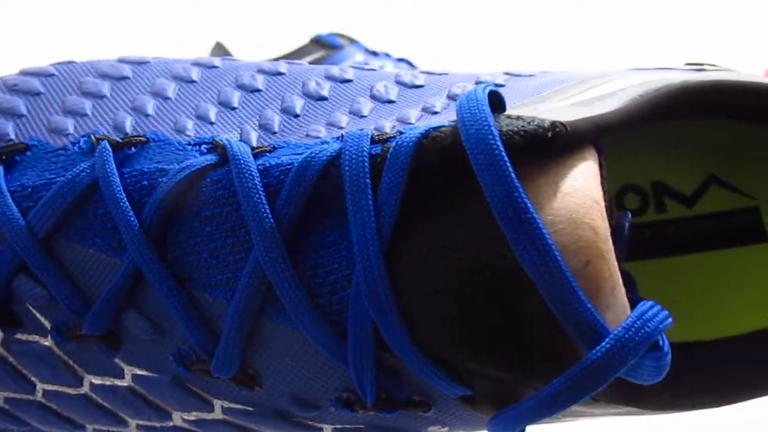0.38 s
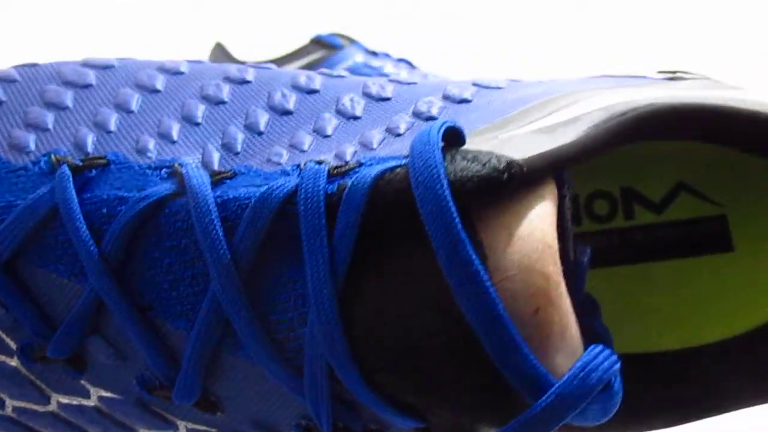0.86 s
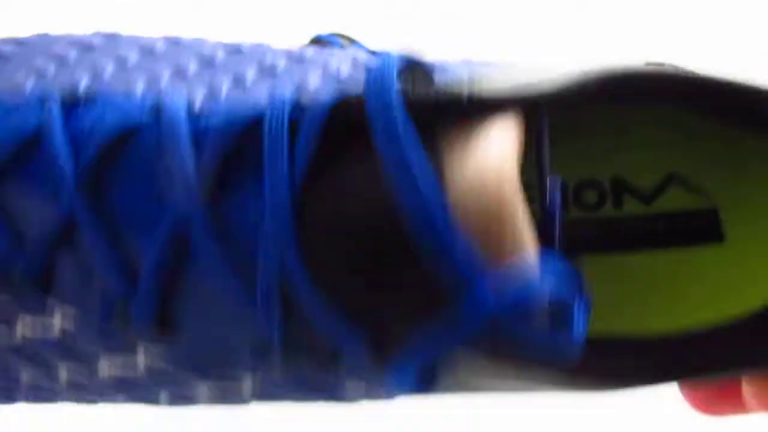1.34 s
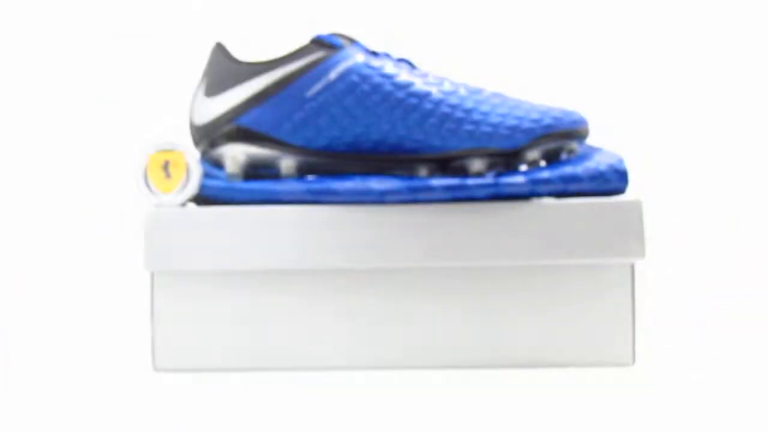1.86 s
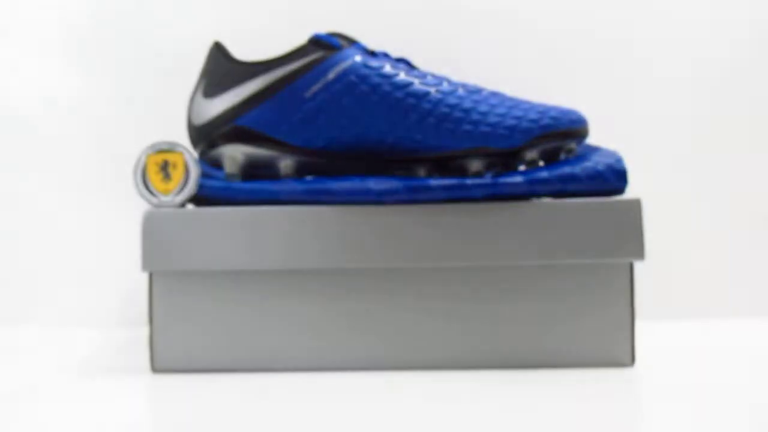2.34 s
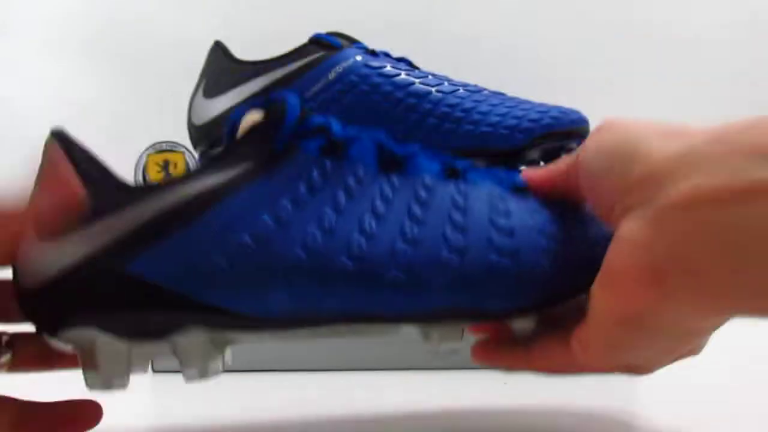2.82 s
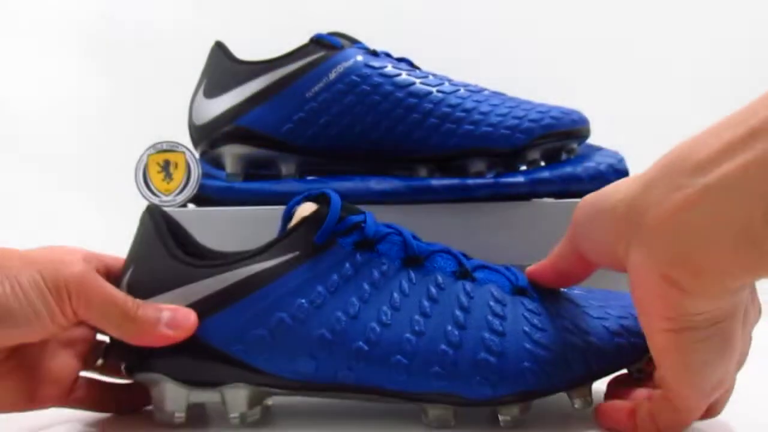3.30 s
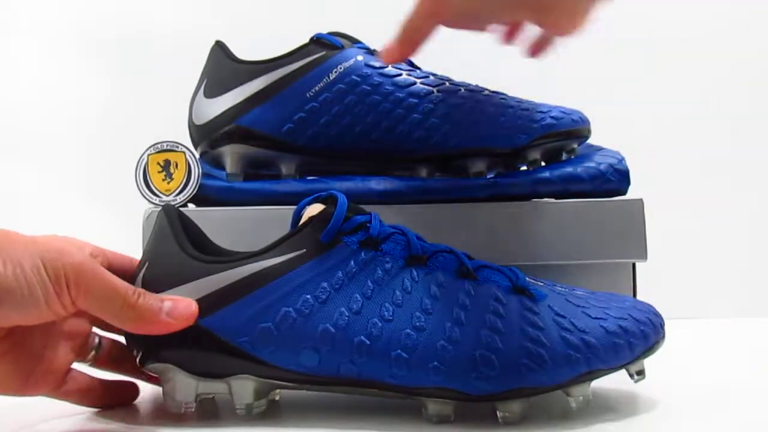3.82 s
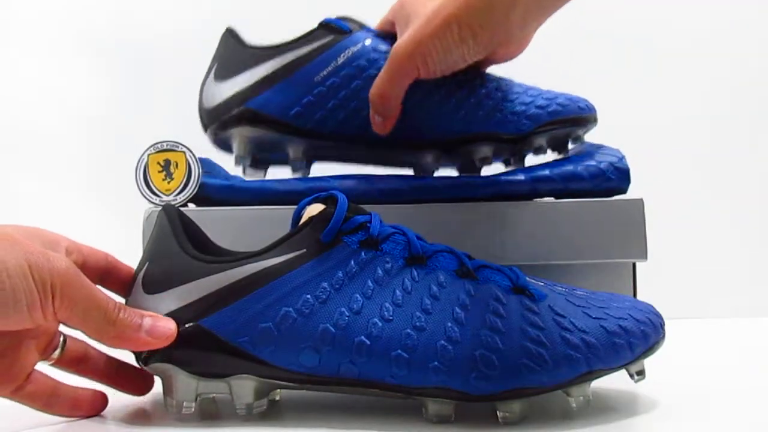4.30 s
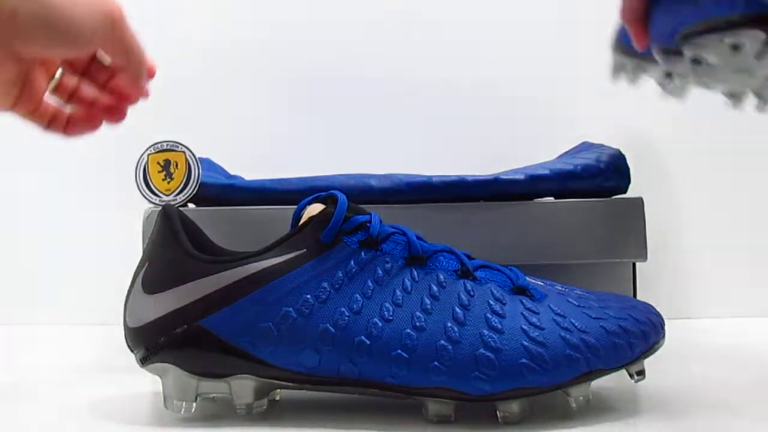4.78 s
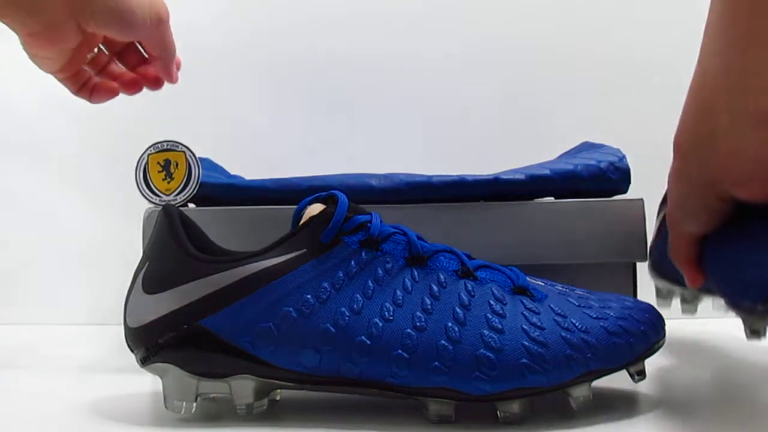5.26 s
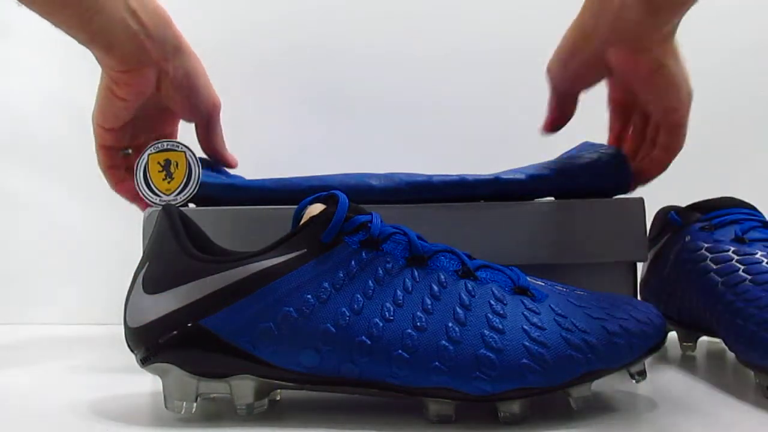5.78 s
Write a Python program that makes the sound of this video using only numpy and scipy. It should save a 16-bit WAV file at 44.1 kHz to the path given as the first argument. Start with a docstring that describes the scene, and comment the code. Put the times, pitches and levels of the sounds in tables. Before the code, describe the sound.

In a quiet small room, close to a stereo microphone, hands turn a football boot with faint rubbing and tiny ticks. A very sharp, dry plastic clack bursts out at two seconds, followed by bumps and scuffs. Studs thud onto a table around three seconds, then light handling. A second boot lands in a rapid cluster of hard knocks with a bright scrape, ending in soft rustling.

```python
"""A quiet room: a football boot is turned in the hands close to a stereo microphone, then two boots are set on a table.
Fingers rub the textured upper in swelling strokes of noise, and narrow noise booms in the hollow boot.
Bumps, the sole's clack and the stud knocks are dying sines; short snaps and rasps tick; loose parts rattle as noise.
The hits also ring through a small room of near echoes and a sparse tail, over room air and a faint hum."""
import sys
import numpy as np
from scipy import signal
from scipy.io import wavfile
from scipy.ndimage import uniform_filter1d

SR = 44100
rng = np.random.default_rng(int(sys.argv[2]) if len(sys.argv) > 2 else 0)


def gain_from_decibels(decibels):
    """Convert decibel values to linear amplitude factors."""
    exponent = np.asarray(decibels, float) / 20
    return 10 ** exponent


def output_pcm(signal):
    """Save a mono or channel-first signal as 16-bit PCM at the path in sys.argv[1].

    Samples are clipped to [-1, 1] before scaling.
    """
    pcm = np.clip(np.atleast_2d(signal).T, -1, 1) * 32767
    wavfile.write(sys.argv[1], SR, np.round(pcm).astype(np.int16))


N = 270460  # length in samples


def evened(x):
    """Scales to rms 1."""
    return x / np.sqrt(np.mean(x ** 2) + 1e-20)


def read(points, hz):
    """Reads a table of (Hz, value) over log frequency."""
    f, value = np.transpose(points)
    return np.interp(np.log(hz + 1), np.log(f + 1), value)


def add(mix, s, sound, pan_db):
    """Places a sound in level and time: the capsules are spaced, so the louder side also hears it first."""
    lag_ms_per_db = 0.13
    waves = np.broadcast_to(sound, (2, sound.shape[-1]))
    for side, sign, wave in zip(mix, (1, -1), waves):
        start = round((s - sign * pan_db * lag_ms_per_db / 2000) * SR)  # each side takes half the lag
        part = side[start:][:len(wave)]
        part += gain_from_decibels(sign * pan_db / 2) * wave[:len(part)]


def band(x, hz, sharp):
    """A broad resonance passed twice, for steep flanks."""
    b, a = signal.iirpeak(hz, sharp, SR)
    return signal.lfilter(b, a, signal.lfilter(b, a, x))


def ring(modes, spread_db, detune):
    """Struck modes as dying sines, a little different for each blow, peak 1."""
    t = np.arange(SR // 2) / SR
    luck = rng.standard_normal((len(modes), 2))
    x = 0
    for (hz, db, t60), (louder, sharper) in zip(modes, luck):
        decay = gain_from_decibels(db + spread_db * louder - 60 * t / t60)
        x = x + decay * np.sin(2 * np.pi * hz * (1 + detune * sharper) * t)
    return x / abs(x).max()


def rattle(bands, apart):
    """Loose parts as dying noise in broad bands, partly different at the two capsules."""
    t = np.arange(SR // 6) / SR
    grit = rng.standard_normal(len(t)) + apart * rng.standard_normal((2, len(t)))
    return sum(gain_from_decibels(db - 60 * t / t60) * evened(band(grit, hz, 1.13)) for hz, db, t60 in bands)


def noise(colour, same, patchy_db, size):
    """Stereo noise of random short spectra with drifting patches, rms 1."""
    hop = size // 4
    frames, hz = N // hop + 5, np.fft.rfftfreq(size, 1 / SR)
    a, b, c, d, patches = rng.standard_normal((frames, len(hz), 5)).T
    patches = uniform_filter1d(patches, size // 64, 0)  # smooth over frequency
    patches = evened(uniform_filter1d(patches, 8, 1))  # and over time
    like = np.clip(read(same, hz), -1, 1)[:, None]
    left = a + 1j * b
    right = like * left + np.sqrt(1 - like ** 2) * (c + 1j * d)
    spectra = np.array([left, right]) * gain_from_decibels(read(colour, hz)[:, None] + patchy_db * patches)
    return evened(signal.istft(spectra, nperseg=size, noverlap=size - hop)[1][:, :N])


# Colour of the room air. Each row: frequency in Hz, relative density in dB per Hz.
AIR_COLOUR = [(12, -37), (20, 7), (60, -2), (98, -6), (210, -8.5), (367, -19), (459, -12.5), (542, -18),
              (780, -19), (976, -20), (1090, -17), (1960, -25.5), (2140, -29), (9670, -31.5),
              (16000, -36.5)]
# Likeness of the air at the two capsules. Each row: frequency in Hz, left-right likeness (0 to 1).
AIR_LIKENESS = [(40, 0.067), (100, 0.022), (300, 0.064), (700, 0.12), (3000, 0.034), (15000, 0.047)]
# Mains hum. Each row: frequency in Hz, level in dB rms.
MAINS_HUM = [(50, -59), (100, -76), (150, -75), (200, -69)]


def air():
    """Still room air as coloured noise, with a faint hum of steady sines."""
    t = np.arange(N) / SR
    hum = 0
    for hz, db in MAINS_HUM:
        hum = hum + np.sqrt(2) * gain_from_decibels(db) * np.sin(2 * np.pi * (hz * t + rng.random()))
    return hum + gain_from_decibels(-51.5) * noise(AIR_COLOUR, AIR_LIKENESS, 0.87, size=2048)


# Decay of the room tail. Each row: frequency in Hz, t60 in seconds.
ROOM_DECAY = [(100, 0.1), (500, 0.32), (2000, 0.24), (5000, 0.22), (12000, 0.36)]
# Echoes of near walls. Each row: delay in ms (a hair later at random), level in dB.
NEAR_ECHOES = [(1.3, -22.5), (2.6, -16.5), (4.5, -28.5), (9.5, -19.5), (13, -25.5), (23.5, -17.5)]


def room(x):
    """A few near echoes, and sparse taps of random sign that die band by band."""
    taps = np.zeros((2, SR // 2))
    at = np.arange(200, SR // 2 - 20, 20)
    at = at + rng.integers(0, 20, (2, len(at)))
    np.put_along_axis(taps, at, rng.choice([-1., 1.], at.shape), 1)
    hz, t, spectra = signal.stft(taps, SR, nperseg=256)
    decay = gain_from_decibels(-60 * t / read(ROOM_DECAY, hz)[:, None])
    tail = signal.istft(spectra * decay, SR, nperseg=256)[1]
    tail *= gain_from_decibels(-11.5) / np.linalg.norm(tail[0])
    for ms, db in NEAR_ECHOES:
        tail[[0, 1], round(ms * SR / 1000) + rng.integers(0, 6, 2)] += gain_from_decibels(db)
    return signal.fftconvolve(x, tail, axes=1)[:, :N]


# Skin, cloth or sole sliding over a surface. Each row: loudest moment in seconds, rise in seconds,
# fall in seconds, glide hiss in dB, scuff in dB (both at the loudest moment).
SLIDING_STROKES = [(.732, 0.033, .02, -64, -61.5), (.81, 0.037, 0.095, -53.5, -53.5),
                   (1.036, 0.042, 0.08, -65, -59), (1.33, 0.093, 0.083, -58.5, -58),
                   (1.48, .05, 0.09, -67, -61), (1.634, .03, 0.05, -52, -52),
                   (1.792, .12, 0.016, -45, -50.5), (1.845, 0.022, 0.036, -53.5, -67),
                   (1.889, .012, 0.051, -47.5, -48.5), (1.96, 0.036, 0.028, -47.5, -58.5),
                   (2.012, 0.023, 0.036, -37.5, -57), (2.11, 0.036, 0.024, -66, -75),
                   (2.15, .012, 0.025, -55, -46), (2.39, 0.19, 0.025, -53, -59),
                   (2.45, 0.025, 0.02, -49, -52), (2.566, 0.048, 0.033, -47.5, -49),
                   (2.63, .04, 0.057, -52, -56.5), (2.758, 0.048, 0.037, -45, -48),
                   (2.93, 0.11, 0.12, -57.5, -53), (3.07, 0.048, .2, -49, -49),
                   (3.235, 0.18, 0.035, -76, -49), (3.32, 0.042, .2, -62, -75),
                   (3.552, 0.017, 0.018, -47, -47), (3.84, 0.22, 0.22, -55.5, -84),
                   (4.025, .025, 0.25, -59.5, -55), (4.2, 0.021, 0.093, -52.5, -52),
                   (4.366, 0.059, 0.013, -64, -58), (4.446, 0.068, .1, -66, -58.5),
                   (4.71, 0.014, 0.12, -62, -62), (5.052, 0.0083, 0.019, -59.5, -56),
                   (5.15, 0.014, .04, -65, -57), (5.289, 0.0073, 0.094, -23, -49),
                   (5.338, 0.042, .08, -19.5, -41.5), (5.482, .03, 0.05, -27, -44),
                   (5.825, 0.036, 0.036, -53.5, -54.5), (5.911, 0.054, 0.048, -44.5, -49.5),
                   (5.965, 0.043, 0.052, -44.5, -45.5), (6.049, 0.026, 0.16, -46.5, -42.5),
                   (6.11, 0.048, 0.086, -62, -42.5)]


def strokes(t):
    """Power of glide and scuff: each stroke swells to its loudest moment and fades."""
    edge_db, roundness = -12.5, 1.74  # level at the ends of rise and fall; how flat the top is
    power = np.zeros((2, len(t)))
    for s, rise, fall, glide_db, scuff_db in SLIDING_STROKES:
        away = np.where(t < s, (s - t) / rise, (t - s) / fall)
        loudest_db = np.array([[glide_db], [scuff_db]])
        power += gain_from_decibels(2 * (loudest_db + edge_db * away ** roundness))
    return power


# The grip shifting all the while. Each row: time in seconds, scuff in dB, boot hollow in dB,
# handling rumble in dB, hands' place as left minus right in dB.
GRIP_SHIFTS = [(0, -73, -84, -66, 4), (.66, -70, -73, -67, -6), (.76, -68, -53, -60.5, -5.5),
               (1.0, -75, -62, -71, -4), (1.27, -63, -54.5, -86, -10.5), (1.56, -59, -61, -62, -2.5),
               (1.72, -62, -57.5, -56, 1), (1.83, -58.5, -58, -63, 2.5), (1.94, -55, -50.5, -48, 1),
               (2.12, -49.5, -54, -49, 0.5), (2.3, -49.5, -65, -56, 1.5), (2.58, -50, -45, -56, 1),
               (2.78, -63.5, -60.5, -71, 0), (3.0, -73, -56, -56, 1), (3.2, -61, -55, -40, 0.5),
               (3.5, -56.5, -59.5, -61, -0.5), (3.801, -63, -75, -70, 3), (4.0, -65, -78, -64, 3),
               (4.17, -57.5, -64.5, -53, -1.5), (4.35, -65.5, -71, -57.5, 1),
               (4.621, -55.5, -67.5, -68.5, -1), (5.1, -65.5, -59, -72, -2.5), (5.3, -65, -73, -55.5, 2.5),
               (5.52, -43, -47, -39, 0.5), (5.68, -72, -90, -73, 1), (5.821, -60, -70, -49, 0),
               (6.02, -51.5, -58, -55.5, 0.5), (6.13, -56, -51.5, -45, -0.5)]
# Colours of glide, scuff and rumble. Each row: frequency in Hz, relative density in dB per Hz.
GLIDE_COLOUR = [(1180, -27), (2000, -18.5), (2360, -32), (3580, -10), (4610, -12.5), (5030, -11.5),
                (6090, -6.5), (7700, -6), (9010, 0.5), (11400, 0), (15300, -11.5), (16000, -49)]
SCUFF_COLOUR = [(300, 4), (700, 3), (1500, 0.5), (3000, -3), (6000, -6), (12000, -16)]
RUMBLE_COLOUR = [(30, -34), (70, 6.5), (130, -2), (220, 2), (320, -2.5), (600, -37.5)]
# Likeness of the rubbing at the two capsules. Each row: frequency in Hz, left-right likeness (-1 to 1).
RUB_LIKENESS = [(60, 0.16), (240, 0.84), (950, 0.72), (3770, -0.1), (15000, -0.11)]
# Air resonance in the boot. One row: frequency in Hz, width in Hz.
BOOT_HOLLOW = (361.5, 30)


def rubbing():
    """Skin and cloth glide and scuff on the textured upper and shake the boot's hollow."""
    now, coarse = np.arange(N) / SR, np.arange(0, N + 32, 32) / SR
    s, *columns = np.transpose(GRIP_SHIFTS)
    grip_db, hollow_db, rumble_db, pan_db = (np.interp(now, s, c) for c in columns)
    glide, scuff = (np.interp(now, coarse, power) for power in strokes(coarse))
    # the texture catches unevenly
    catch = gain_from_decibels(1.64 * evened(uniform_filter1d(rng.standard_normal(N), 150)))
    # slower unevenness of hollow and rumble
    heave = gain_from_decibels(4.3 * evened(uniform_filter1d(rng.standard_normal(N), 900)))
    hollow_hz, width_hz = BOOT_HOLLOW
    hz = np.geomspace(100, 1200, 60)
    peak_db = -20 * np.log10(1 + (2 * (hz - hollow_hz) / width_hz) ** 2) / 1.79
    hollow_colour = np.transpose([hz, peak_db])
    high = np.sqrt(glide) * noise(GLIDE_COLOUR, RUB_LIKENESS, 1.3, size=256)
    scuffing = evened(catch * noise(SCUFF_COLOUR, RUB_LIKENESS, 2.5, size=256))
    high += np.sqrt(scuff + gain_from_decibels(2 * grip_db)) * scuffing
    low = gain_from_decibels(hollow_db) * noise(hollow_colour, [(100, 0.66), (1000, 1.0)], 1.7, size=2048)
    low += gain_from_decibels(rumble_db) * noise(RUMBLE_COLOUR, [(50, 0.93), (300, 0.73)], 3.0, size=2048)
    return high * gain_from_decibels(np.array([pan_db / 2, -pan_db / 2])) + low * evened(heave)


# Fingers and knuckles bump boot, lid or table. Each row: start in seconds, level in dB, pitch in Hz
# (varied a little), t60 in seconds, left minus right in dB (halved in playing).
SOFT_BUMPS = [(0.276, -44.5, 344, 0.065, -5), (0.8, -43, 80.7, 0.059, -4), (1.796, -33.5, 350, 0.072, -1),
              (1.923, -26.5, 380, 0.093, 0), (2.0362, -24, 342.4, 0.086, 2),
              (2.151, -33.5, 376, 0.095, 0.5), (2.433, -23, 94, 0.021, -6), (2.446, -41, 80.7, 0.026, 1),
              (2.499, -31, 88.8, 0.017, -3), (2.6, -43, 384, 0.054, -1), (2.749, -41.5, 501, 0.085, 5),
              (2.815, -38, 376, 0.095, -1), (2.848, -37.5, 146, 0.14, -4), (2.924, -35, 419, 0.095, -2),
              (2.994, -44, 526, 0.042, -2.0), (3.085, -20.5, 146, 0.072, -1), (3.672, -40.5, 103, 0.15, 8),
              (4.102, -41.5, 384, 0.095, 0), (4.17, -50, 213, 0.13, -6), (4.225, -37, 232, 0.15, 3),
              (4.932, -41.5, 80.7, 0.049, 8), (5.169, -42.5, 363, 0.17, 3), (5.238, -35, 350, 0.1, -1.0),
              (5.791, -41, 230, 0.17, 2), (5.812, -40.5, 115, 0.1, 2), (5.946, -38.5, 248, 0.36, -2),
              (6.066, -38, 120, 0.16, 0), (6.09, -31, 240, 0.071, 0.5), (6.111, -29, 128, 0.15, 1)]


def bumps():
    """A soft push, smoothed over a millisecond: a brief low thump and one damped thud each."""
    out, push = np.zeros((2, N)), np.hanning(45)
    for s, db, hz, t60, pan_db in SOFT_BUMPS:
        modes = [(120, -8, .03), (hz, 0, t60), (hz * 1.365, -8, t60 / 2), (hz * 3.05, -12, t60 / 3)]
        thud = signal.oaconvolve(ring(modes, 1.9, 0.034), push / push.sum())
        add(out, s, gain_from_decibels(db) * thud, pan_db / 2)
    return out


# Ticks and short scuffs of studs, sole, laces and nails. Each row: start in seconds, peak in dB,
# pitch in Hz, left minus right in dB, time constant of the rasp in ms.
SMALL_TICKS = [(1.477, -37, 5500, -2, 1.4), (1.5944, -40, 2000, 3.5, 1), (1.595, -29, 10000, 1.5, 0.6),
               (1.6267, -37.5, 1180, 1.5, 1), (1.6272, -33, 10500, 2, .5), (1.667, -37, 2500, -3.5, 0.36),
               (1.797, -29.5, 4930, 6.5, 3.9), (1.8849, -33, 9000, -1, 9.3), (1.9247, -32, 2500, -2, 0.6),
               (1.9254, -25, 11000, -1, 0.53), (2.0029, -27, 11000, 1, 3.3), (2.1483, -25.5, 7500, 9, 2.6),
               (2.4269, -25.5, 11000, -4, 1), (2.4458, -35, 1680, -0.5, 2.2), (2.447, -24, 10000, 1, .5),
               (2.4984, -33.5, 1860, -5.5, 3), (2.5993, -35.5, 665, -5.5, 7.8), (2.666, -38.5, 870, 3, 3.8),
               (2.727, -32, 5800, 6.5, 3), (2.772, -47, 2500, 1, 0.41), (2.7727, -22.5, 11000, 5.5, 0.8),
               (2.85, -40, 850, 2, 3.7), (2.8508, -23, 12100, 3.5, 0.34), (3.2323, -24.5, 6500, 4.5, 3),
               (3.2512, -37, 3780, 0.5, 3.1), (3.5549, -34.5, 2400, -8, 4.1), (4.0353, -38, 2040, -6, 2.2),
               (4.33, -40.5, 4360, -7, 2.7), (4.4394, -37, 6000, -2.5, .5),
               (4.7096, -18.5, 3860, 0.5, 0.78), (4.763, -35.5, 1600, -2, 2.2), (5.0525, -51, 2500, -8, 1),
               (5.1542, -43.5, 2300, -11, 2.2), (5.2394, -35.5, 1410, -5.5, 2.1),
               (6.094, -27, 1120, -9, 1.9)]


def ticks():
    """Each tick is a snap and a dying rasp heard through one broad resonance."""
    out, t = np.zeros((2, N)), np.arange(1500) / SR
    for s, db, hz, pan_db, length_ms in SMALL_TICKS:
        rasp = .7 * rng.standard_normal((2, len(t))) * np.exp(-1000 * t / length_ms)
        rasp[:, 0] = 4  # the snap
        sharp = 0.57 + 0.21 * min(length_ms, 3)  # longer ticks ring in a narrower band
        tick = band(rasp, hz, sharp)
        add(out, s, gain_from_decibels(db) * tick / abs(tick).max(), pan_db)
    return out


# The sole plate struck hard. One row: start in seconds, peak in dB, left minus right in dB.
SOLE_CLACK = (2.04105, -1, .5)
# Modes of the sole plate. Each row: frequency in Hz, relative level in dB, t60 in seconds.
PLATE_MODES = [(1300, -2, .005), (1900, 5, .004), (3300, 13, .005), (3460, 6, .012), (4600, 4, .003),
               (5500, 1, .003), (6600, 3, .004), (7900, 0, .003), (9700, 6, .004), (13000, 0, .003),
               (15000, -8, .002)]
# Noisy rattle of the plate. Each row: band centre in Hz, relative level in dB, t60 in seconds.
PLATE_RATTLE_BANDS = [(1480, -17, .012), (3580, 5, 0.017), (4070, -15, 0.24), (6500, 6, 0.025),
                      (9640, -1, 0.0097)]


def clack():
    """One hard snap rings the sole plate, and a short noisy rattle follows."""
    s, db, pan_db = SOLE_CLACK
    out = np.zeros((2, N))
    add(out, s, gain_from_decibels(db) * ring(PLATE_MODES, 0, 0), pan_db)
    add(out, s + .0004, gain_from_decibels(db - 18) * rattle(PLATE_RATTLE_BANDS, 1.0), 0)
    return out


# Studs land on the table. Each row: start in seconds, table top in dB, table sway in dB, clatter in dB,
# stud click in dB, left minus right in dB (in full for the click, halved for the rest).
STUD_KNOCKS = [(3.034, -1.5, -26.5, -11.5, -9.5, 3.5), (3.2878, -9.5, -27.5, -16, -22, 0),
               (3.4136, -26.5, -39.5, -28, -40, -1), (5.3575, -3, -43, -1.5, -2.5, -2.5),
               (5.3662, -7, -27, -12.5, -25, 6), (5.409, -5, -52, -9.5, -3.5, -5),
               (5.4123, -1.5, -34, -6.5, -9.5, -2), (5.421, -38, -46, -15.5, -29, 4),
               (5.4624, -9, -51, -12.5, -8.5, -1), (5.471, -11, -55, -23.5, -37, 3),
               (5.487, -4.5, -42, -17.5, -52, -2.5)]
# Modes of table top, table sway, boot body and stud, each varied a little from blow to blow.
# Each row: frequency in Hz, relative level in dB, t60 in seconds.
TABLE_MODES = [(120.4, 1, 0.18), (140.5, 4.5, 0.15), (201, 2.5, 0.1), (234, 0, 0.1), (326, -2.5, 0.07)]
SWAY_MODES = [(67.9, 0, 0.44)]
BODY_MODES = [(303, -30, .07), (376, -4, 0.17), (443.4, -0.5, 0.052), (528, 3.5, 0.035), (633, -5, 0.046),
              (789, 0, 0.02), (898, -12.5, 0.049)]
STUD_MODES = [(950, -23, 0.0073), (1404, 16, 0.016), (1730, 15, 0.015), (2300, 9, 0.011),
              (2950, 23, 0.0019), (3560, 9, 0.0054), (4500, 6, 0.0045)]
# Noisy rattle of the sole. Each row: band centre in Hz, relative level in dB, t60 in seconds.
SOLE_RATTLE_BANDS = [(457, -33.5, 0.036), (850, -2.5, 0.091), (1380, -12, 0.03), (2600, -21, 0.042)]


def knocks():
    """The stud tip clicks, sole and upper clatter, and the table top swells into its low modes."""
    out, t = np.zeros((2, N)), np.arange(SR // 2) / SR
    blunt = np.bartlett(M=9) / 4  # the rounded tip softens the treble
    swell = 1 - np.exp(-t / 0.0032)  # the heavy top takes time to bend
    for s, table_db, sway_db, clatter_db, click_db, pan_db in STUD_KNOCKS:
        top = gain_from_decibels(table_db) * ring(TABLE_MODES, 3.9, 0.0081)
        top += gain_from_decibels(sway_db) * ring(SWAY_MODES, 0, 0.018)
        clatter = np.convolve(ring(BODY_MODES, 2.4, 0.03), blunt)
        click = np.convolve(ring(STUD_MODES, 0.94, 0.11), blunt)
        add(out, s + 0.0011, -swell * top, pan_db / 2)
        add(out, s, gain_from_decibels(clatter_db) * clatter, pan_db / 2)
        add(out, s, gain_from_decibels(clatter_db - 14.0) * rattle(SOLE_RATTLE_BANDS, 0.52), pan_db / 2)
        add(out, s, gain_from_decibels(click_db) * click, pan_db)
    return out


def scene():
    """Hits, direct and through the room, over the rubbing and the still air."""
    low, small, hard = knocks() + bumps(), ticks(), clack()
    echoed = room(gain_from_decibels(0.5) * low + gain_from_decibels(-3.0) * small + hard)
    return low + small + hard + echoed + rubbing() + air()


def top_cut(x):
    """Nothing passes above the cut-off."""
    return signal.sosfilt(signal.butter(12, 16200, fs=SR, output="sos"), x)


def record(dry):
    """The microphone drops the deepest bass, below about 42 Hz."""
    bass_cut = signal.butter(N=3, Wn=42, btype="high", fs=SR, output="sos")
    mix = signal.sosfilt(bass_cut, dry)
    return top_cut(mix)


dry = scene()
out = record(dry)
output_pcm(out)
```